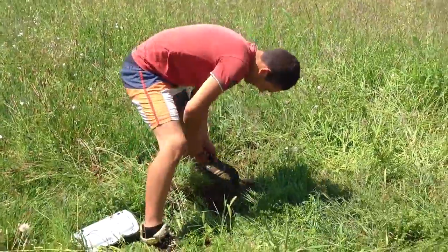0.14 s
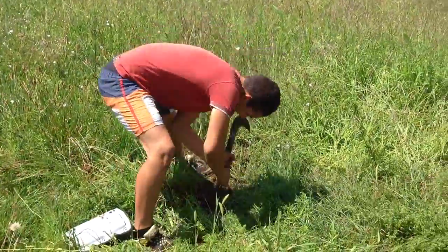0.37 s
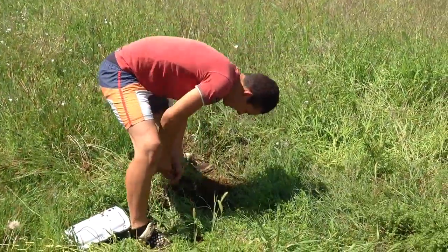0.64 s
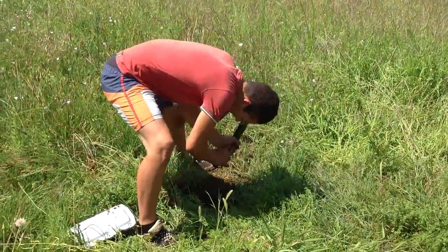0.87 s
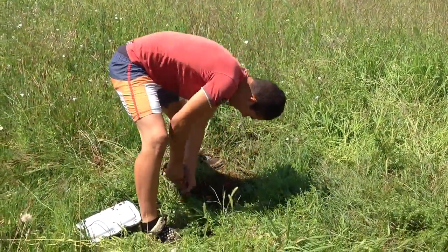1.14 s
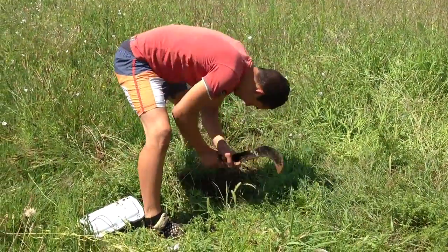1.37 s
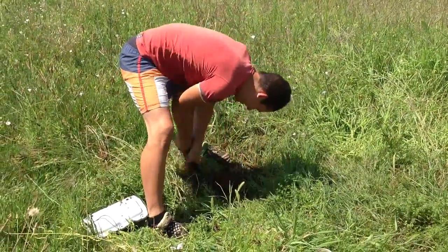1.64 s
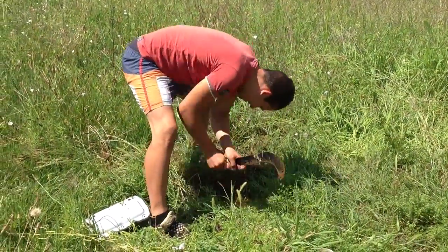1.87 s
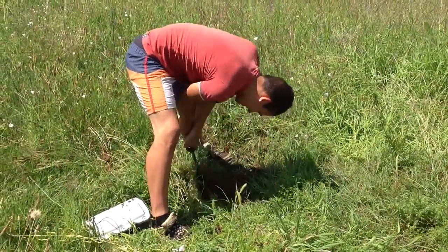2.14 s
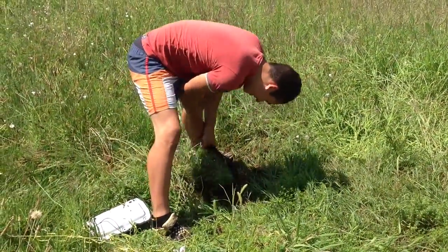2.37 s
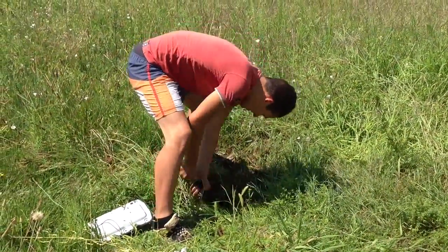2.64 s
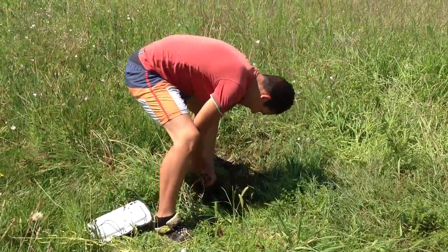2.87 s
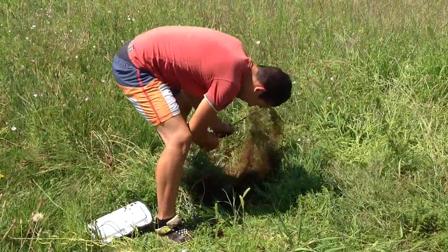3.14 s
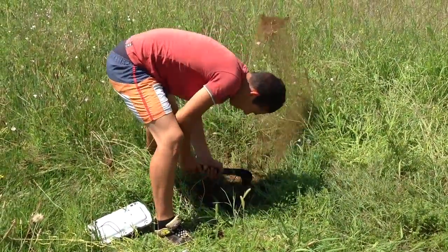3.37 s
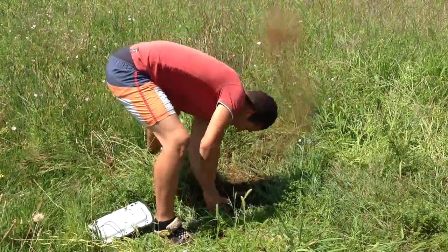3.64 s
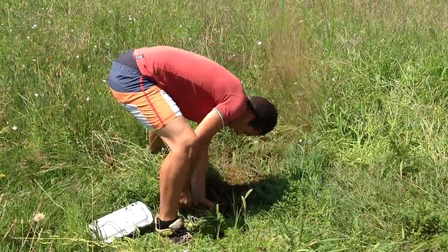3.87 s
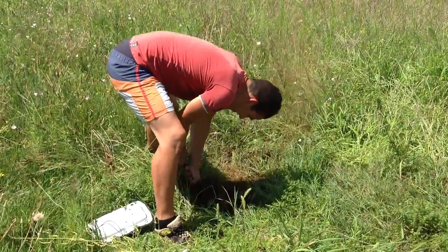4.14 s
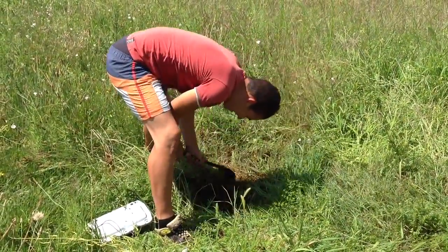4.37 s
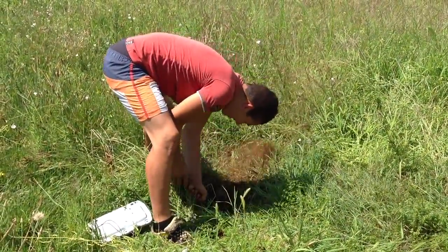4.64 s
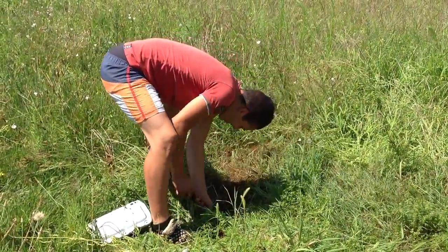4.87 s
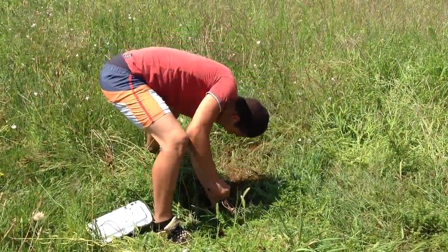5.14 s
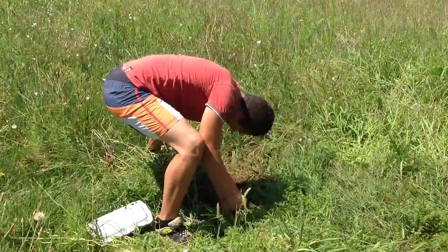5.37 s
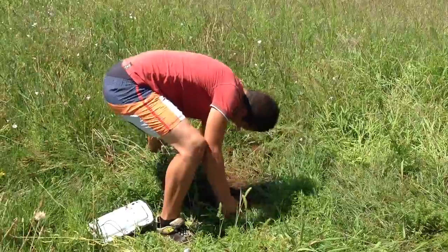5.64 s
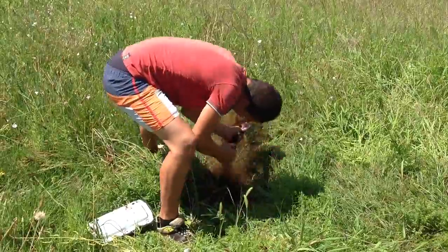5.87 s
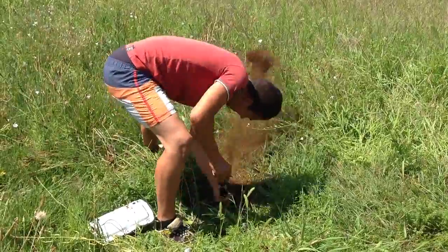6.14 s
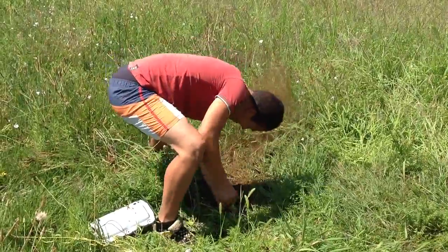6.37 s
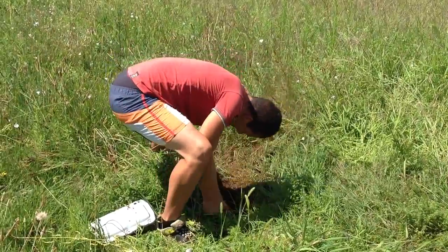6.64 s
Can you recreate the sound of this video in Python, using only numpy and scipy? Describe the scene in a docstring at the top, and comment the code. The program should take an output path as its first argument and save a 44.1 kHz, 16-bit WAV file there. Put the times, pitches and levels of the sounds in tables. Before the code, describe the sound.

An open summer field: soft broadband hush, low distant rumble and faint engine hum, with a cicada chirring near 4.5-5 kHz in quick raspy bursts, about six a second, throughout. Light ticks and grassy rustle open the scene. A hooked blade chops into turf at 0.5, 1.1, 1.6 and 2.1 s: brief grass swish, gritty crunch, short sagging thud. The first and fourth clack brightly on stone, the second knocks lower, the third is duller and earthier. Soil rustles after the last. From 2.8 to 3.1 s the blade scrapes and knocks on stones. A big handful of earth is flung at 3.2 s, hissing down in fine grains; another swell comes at 3.9 s, then scraping clinks around 4.2 s. Quieter raking and small ticks run from 4.7 to 5.6 s. More soil showers at 6.2 and 6.45 s, with soft wind buffeting. Close, dry, identical in both channels.

```python
"""A hooked hand tool chops four times into grassy soil, knocks on stones, then rakes and flings loose earth.
Soil is made of random grains, thuds are sagging tones, and knocks are gritty contacts ringing blade modes.
A cicada chirrs in short bursts of pulsed noise through body resonances.
Filtered noise gives the hush of a summer field, rumble, wind and a far engine hum; both channels are alike."""
import sys
import numpy as np
from scipy import signal
from scipy.fft import rfft, irfft
from scipy.io import wavfile
from scipy.ndimage import uniform_filter1d

SR = 44100
rng = np.random.default_rng(int(sys.argv[2]) if len(sys.argv) > 2 else 0)


def level_to_linear(level):
    """Convert decibel levels to linear amplitude factors, elementwise."""
    exponent = np.asarray(level, float) / 20
    return 10 ** exponent


def wrap_up_sound(samples):
    """Save the sound to the file named by the first command line argument, as 16-bit audio."""
    columns = np.atleast_2d(samples).T
    # keep every value between -1 and 1, then stretch to whole-number steps
    tamed = np.clip(columns, -1, 1)
    steps = np.round(tamed * 32767).astype(np.int16)
    wavfile.write(sys.argv[1], SR, steps)


N = 298116  # length in samples


def rms_one(x):
    """Scale to unit rms."""
    return x / np.sqrt(np.mean(x ** 2) + 1e-20)


def peak_one(x):
    """Scale to unit peak."""
    return x / np.abs(x).max()


def coloured(x, spectrum):
    """Give a white signal a spectrum, drawn straight over log frequency; rms 1."""
    hz, level_db = np.transpose(spectrum)
    log_hz = np.log(np.arange(1, N // 2 + 2) * SR / N)
    gain = level_to_linear(np.interp(log_hz, np.log(hz), level_db))
    return rms_one(irfft(rfft(x) * gain, N))


def drift(rate):
    """Slow random wander: normal steps of spread 1, rate per second, joined by straight lines."""
    steps = rng.standard_normal(int(rate * N / SR) + 2)
    return np.interp(np.arange(N) * rate / SR, np.arange(len(steps)), steps)


def grains(per_s, spread_db):
    """Random clicks of either sign with a long-tailed spread of sizes."""
    sizes = level_to_linear(spread_db * np.minimum(rng.exponential(1, N), 5))
    signed = sizes * rng.choice([-1, 1], N)
    return signed * (rng.random(N) < per_s / SR)


def resonance(x, hz, width_hz):
    """Two-pole band-pass with gain about 1 on top."""
    r = np.exp(-np.pi * width_hz / SR)
    feedback = [1, -2 * r * np.cos(2 * np.pi * hz / SR), r * r]
    return signal.lfilter([(1 - r * r) / 2, 0, (r * r - 1) / 2], feedback, x)


def band(x, low_hz, high_hz):
    """Butterworth band-pass."""
    return signal.sosfilt(signal.butter(2, [low_hz, high_hz], "band", fs=SR, output="sos"), x)


def add(out, s, piece):
    """Mix a short sound in at time s."""
    at = round(s * SR)
    out[at:at + len(piece)] += piece[:N - at]


# spectrum of the field's hush: hz, level_db [dB per Hz]
HUSH_SPECTRUM = [(25, -42.5), (55, -17.5), (82, -9.5), (160, -2.5), (470, -4), (930, -2), (1250, -8),
                 (3600, -13), (6100, -13), (8300, -13.5), (15500, -14)]
# swells of wind on the microphone: centre_s, level_db, half_length_s [to 1/e]
WIND_GUSTS = [(4.5, -77, .12), (6.303, -68.5, 0.19), (6.593, -65.5, 0.175)]
# partials of the engine hum: pitch_hz, width_hz, level_db
HUM_PARTIALS = [(84, 4, -7), (167, 6, 0)]
# wavering of the engine hum: time_s, level_db
HUM_LEVELS = [(0, -67), (.43, -70), (1.0, -68.5), (2.5, -75), (3.0, -68.5), (3.5, -75), (4.4, -73),
              (4.8, -73), (6.0, -69), (6.36, -73.5), (6.76, -69)]
HUSH_DB, RUMBLE_DB, BREEZE_DB = -59, -71.5, -78.5  # each wavers around its level


def field():
    """Noise bands: the hush, far traffic near 200 Hz, wind on the microphone near 100 Hz, an engine hum."""
    t = np.arange(N) / SR
    hush = level_to_linear(HUSH_DB + 0.78 * drift(6.8)) * coloured(rng.standard_normal(N), HUSH_SPECTRUM)

    rumble_level = level_to_linear(RUMBLE_DB + 1.5 * drift(9.2) + 1.86 * drift(2.539))
    rumble = rumble_level * rms_one(band(rng.standard_normal(N), 150.1, 319.5))

    gusts = level_to_linear(BREEZE_DB)
    for s, level_db, half_s in WIND_GUSTS:
        gusts = gusts + level_to_linear(level_db) * np.exp(-((t - s) / half_s) ** 2)
    wind = gusts * level_to_linear(4.04 * drift(11)) * rms_one(band(rng.standard_normal(N), 94.4, 144.8))

    hum_db = np.interp(t, *np.transpose(HUM_LEVELS))
    hum = sum(level_to_linear(level_db) * rms_one(resonance(rng.standard_normal(N), hz, width_hz))
              for hz, width_hz, level_db in HUM_PARTIALS)
    return hush + rumble + wind + level_to_linear(hum_db) * hum


# the cicada's tempo, marking every sixth burst: start_s
SIXTH_BURST_STARTS = [-.03, .937, 1.895, 2.805, 3.73, 4.665, 5.615, 6.59, 7.57]
# the cicada's drum and body: pitch_hz, width_hz [each of two resonators is 1.307 times this], level_db
CICADA_BODY = [(4497.3, 219.3, 1), (4691.6, 109.4, -1.5), (5039, 284, -3.5), (5348.5, 223, -7),
               (6000, 430, -17.5), (6670, 301, -16.5), (7400, 945, -14.5)]
PULSES_PER_S = 195  # on average; the rate wanders
BURST_S, BURST_DB, BURST_SPREAD_DB = 0.1096, -59.5, 0.86
CHORUS_DB = -6.5  # against BURST_DB


def cicada():
    """Fast uneven drum pulses mixed with rasp ring in the body, swelling in bursts that fade a little."""
    t, bursts = np.arange(N) / SR, np.zeros(N)
    marks = np.arange(len(SIXTH_BURST_STARTS))
    starts = np.interp(np.arange(0, len(marks) - 1, 1 / 6), marks, SIXTH_BURST_STARTS)
    for s, chance in zip(starts, rng.standard_normal(len(starts))):
        fading_db = -2.5 * np.clip((t - s) / BURST_S, 0, 1)
        sounding = (t > s) * (t < s + BURST_S)
        bursts += sounding * level_to_linear(BURST_DB + BURST_SPREAD_DB * chance + fading_db)
    soft_edges = uniform_filter1d(bursts, size=SR // 30)
    chorus = level_to_linear(BURST_DB + CHORUS_DB)  # others of its kind, further off

    phase = np.cumsum(PULSES_PER_S * level_to_linear(.8 * drift(60))) / SR
    drum = rng.standard_normal(N) * (1.07 + np.exp(-4.0 * (phase % 1)))
    body = np.zeros(N)
    for k, (hz, width_hz, level_db) in enumerate(CICADA_BODY):
        delayed = np.roll(drum, 9 * k)  # each part of the body answers 9 samples after the last
        once = resonance(delayed, hz, 1.307 * width_hz)
        body += level_to_linear(level_db) * resonance(once, hz, 1.307 * width_hz)
    return (soft_edges + chorus) * rms_one(body)


# handfuls of earth and grass pulled, raked or thrown:
# height_s, soil_db, clods_db, rise_s [per 10 dB of soil], fall_s [per 10 dB of soil]
EARTH_MOVES = [(.08, -61, -64, 0.31, 0.54), (.5, -59.5, -64, 0.08, 0.42), (1.29, -55.5, -65.5, 0.053, 0.05),
               (1.71, -59.5, -66, 0.146, 0.18), (2.21, -51.5, -62.5, 0.123, 0.3),
               (2.86, -62, -56.5, 0.068, .12), (3.06, -59, -60, 0.145, 0.11),
               (3.23, -46.5, -59.5, 0.113, 0.2), (3.6, -56.5, -64, 0.22, 0.17),
               (3.91, -47.5, -62.5, 0.19, 0.2382), (4.0, -63, -58, 0.066, 0.1046),
               (4.17, -54, -55.5, 0.038, 0.1028), (4.4, -60.5, -65.5, 0.24, 0.11),
               (4.7, -54, -65, 0.107, 0.1259), (4.97, -64, -65.5, 0.223, 0.01),
               (5.15, -62, -77.5, 0.091, .2), (5.31, -66, -64, .04, .06), (5.39, -59.5, -60, .07, .08),
               (5.76, -60, -66.5, 0.099, 0.17), (6.19, -51, -63, 0.137, 0.33),
               (6.45, -52.5, -66.5, 0.188, 0.1157)]
# spectrum of the fine soil: hz, level_db [dB per Hz]
SHOWER_SPECTRUM = [(1500, -28.5), (3000, -10.5), (5000, -5), (8500, -5), (13000, -0.5), (15500, -6)]
# spectrum of the clods: hz, level_db [dB per Hz]
CLOD_SPECTRUM = [(600, -21.5), (1400, -6), (2200, -0.5), (3500, -3), (6000, -2.5), (10000, -34)]
STIRRING_SOIL_DB, STIRRING_CLODS_DB = -74, -72  # the hands never rest quite
PEBBLES_PER_S, PEBBLES_DB = 60, -11  # stray ticks, level against the clods


def raking():
    """Soil rains on the grass as dense fine grains; clods scrape coarser and lower, and pebbles tick."""
    t = np.arange(N) / SR
    soil_power, clods_power = level_to_linear(2 * STIRRING_SOIL_DB), level_to_linear(2 * STIRRING_CLODS_DB)
    for s, soil_db, clods_db, rise_s, fall_s in EARTH_MOVES:
        away_db = -10 * np.where(t < s, (s - t) / rise_s, (t - s) / fall_s)
        soil_power = soil_power + level_to_linear(2 * (soil_db + away_db))
        clods_power = clods_power + level_to_linear(2 * (clods_db + 1.25 * away_db))
    shower = coloured(grains(16000 * level_to_linear(1.5 * drift(60)), spread_db=2.5), SHOWER_SPECTRUM)
    clods = coloured(grains(2500 * level_to_linear(2.5 * drift(50)), spread_db=3.5), CLOD_SPECTRUM)
    pebbles = rms_one(resonance(grains(PEBBLES_PER_S, spread_db=4.0), 3370, 1800))
    coarse = clods + level_to_linear(PEBBLES_DB) * pebbles
    return np.sqrt(soil_power) * shower + np.sqrt(clods_power) * coarse


# blade on stone, root or clod:
# start_s, blade_peak_db, pitch_hz [where it rings most], contact_ms [decay to 1/e], dull_peak_db
BLADE_KNOCKS = [(.079, -44.5, 900, 1.08, -46), (0.0972, -44, 2500, 0.62, -48.5),
                (.1515, -53, 2600, .89, -45.5), (.3108, -42, 4700, 0.83, -51),
                (0.5223, -18, 7500, 0.99, -45.5), (.5268, -23.5, 8200, 0.65, -39.5),
                (.5363, -31.5, 11000, 1.4, -56.5), (1.054, -31.5, 3400, 0.69, -61.5),
                (1.0749, -37.5, 12600, 0.72, -36.5), (1.0767, -21, 2990, 1.56, -46.5),
                (1.568, -37.5, 900, 8.1, -40.5), (1.677, -36.5, 9800, 1.28, -46),
                (2.068, -44.5, 900, 4.8, -45.5), (2.0908, -16, 6000, 0.94, -41),
                (2.0925, -23.5, 5500, 3.1, -40), (2.1574, -32, 7400, 3.2, -59.5),
                (2.169, -34.5, 6400, 1.12, -52), (2.782, -38.5, 11000, 0.83, -57),
                (2.8457, -27.5, 3150, 2.44, -55), (2.85, -41.5, 1750, 1.74, -60),
                (2.8871, -23, 2890, .74, -32.5), (2.963, -42, 6000, 0.86, -60),
                (2.972, -38, 4900, .91, -57), (2.9743, -26, 8500, 1.7, -58), (3.0654, -36, 3300, 2.64, -52),
                (3.2743, -38, 8000, 0.59, -56), (3.6172, -34, 6400, 2.65, -58),
                (3.8235, -40, 2620, 1.08, -62), (3.84, -34.5, 9000, 0.68, -62),
                (3.891, -35, 9420, 1.15, -66), (3.983, -50.5, 1900, 1.5, -63),
                (4.007, -37.5, 2232, 5.1, -56.5), (4.1396, -31.5, 3300, 1.7, -66.5),
                (4.146, -33.5, 3300, .89, -54.5), (4.174, -48, 2200, 1.43, -51.5),
                (4.183, -35.5, 2236, 3.4, -46.5), (4.328, -41, 7500, 1.13, -66),
                (4.3414, -35.5, 3620, 0.88, -47.5), (4.3883, -47, 1750, 2.1, -54),
                (4.6985, -43, 3400, 3.2, -55.5), (5.3038, -44.5, 3600, 1.07, -51.5),
                (5.3339, -39, 3600, 1.7, -53), (5.37, -43.5, 3740, 4.2, -57.5),
                (5.399, -41.5, 3900, 2.8, -54), (5.418, -42.5, 3800, 2.5, -52.5),
                (5.44, -53, 1650, 3.8, -60), (5.4612, -43.5, 3300, 1.05, -56.5),
                (5.58, -40.5, 3600, 2.7, -47.5), (5.9988, -44, 11000, .6, -59.5),
                (6.203, -37.5, 9000, 0.95, -56), (6.5285, -37, 3760, 1.8, -52)]
# ringing modes of the blade: pitch_hz, level_db, t60_s [approximate]
BLADE_MODES = [(900, 1, 0.025), (1750, 6, 0.0347), (2671, 1, 0.0186), (3300, -4, 0.0086), (4202, 1, 0.0028),
               (5320, 0.5, 0.0044), (5290, 5.5, 0.0205), (6010, 0.5, 0.013), (6400, 3, 0.0088),
               (7500, 0, 0.0082), (8500, 0, 0.0081), (9800, 4.5, 0.0093), (11390, 1, 0.0076),
               (12600, 0.5, 0.0098)]
GRIT_DB = -5.5  # peak of the bright spit against the blade's peak


def knocks():
    """A short gritty contact drives the blade modes nearest its pitch, a bright spit and a dull knock."""
    out, t = np.zeros(N), np.arange(SR // 16) / SR
    noises = rng.standard_normal((len(BLADE_KNOCKS), 3, len(t)))
    for (s, peak_db, hz, contact_ms, dull_db), noise in zip(BLADE_KNOCKS, noises):
        contact = (1 - np.exp(-t / .0003)) * np.exp(-1000 * t / contact_ms)
        clean_tap = np.sqrt(contact @ contact) * (t == t[8])
        blow = contact * noise[0] + clean_tap  # one clean tap amid the chatter
        rings = np.zeros(len(t))
        for mode_hz, level_db, t60_s in BLADE_MODES:
            mode_db = level_db - 24.14 * np.abs(np.log2(mode_hz / hz))  # weaker by 24.14 dB an octave away
            rings += level_to_linear(mode_db) * resonance(blow, mode_hz, 2.34 / t60_s)
        grit = contact * band(noise[1], 3500, 16000)
        dull = band(noise[2] * np.sqrt(contact), 276, 1160)
        bright = level_to_linear(peak_db) * peak_one(rings) + level_to_linear(peak_db + GRIT_DB) * peak_one(grit)
        add(out, s, bright + level_to_linear(dull_db) * peak_one(dull))
    return out


# bites of the edge into the ground:
# deepest_s, crunch_db, bite_ms [decay to 1/e], lead_in_ms [scale of the swell through grass], lead_in_db
CHOP_BITES = [(0.523, -28.5, 2.08, 12.7, -41), (1.0752, -25, 4.2, 16.9, -38.5),
              (1.571, -32, 11.75, 11.2, -39.5), (2.073, -33.5, 6, 18.75, -36.5)]
# spectrum of the crunch: hz, level_db [dB per Hz]
CRUNCH_SPECTRUM = [(240, -27.5), (400, -18), (1220, -11.5), (2630, -6.5), (4770, -5), (5230, -4),
                   (9650, -4.5), (14400, -1), (15500, -8)]
CRUMBS_DB, CRUMBS_MS = -39.5, 33.6  # what settles after every chop, decay to 1/e


def chops():
    """The edge hisses through grass, crunches into soil, and crumbs settle: one grain texture, shaped."""
    t, envelope = np.arange(N) / SR, np.zeros(N)
    for s, crunch_db, bite_ms, lead_ms, lead_db in CHOP_BITES:
        ms = 1000 * (t - s)
        bite = np.exp(np.where(ms < 0, -(ms / (0.382 * bite_ms)) ** 2, -ms / bite_ms))
        lead = (ms < 0) * np.clip(1.15 + ms / lead_ms, 0, 1) ** .6
        crumbs = (ms >= 0) * np.exp(-np.abs(ms) / CRUMBS_MS)
        envelope += level_to_linear(crunch_db) * bite + level_to_linear(lead_db) * lead + level_to_linear(CRUMBS_DB) * crumbs
    crunch = coloured(grains(20000, spread_db=2.0), CRUNCH_SPECTRUM)
    return envelope * crunch * level_to_linear(1.5 * drift(600))


# the ground thuds under a blow: start_s, level_db [tone before swell and filter], start_hz, t60_s
GROUND_THUDS = [(.526, -38, 256, 0.041), (1.075, -34.5, 296.5, 0.0537), (1.566, -37, 342, 0.073),
                (1.577, -33.5, 253, 0.1243), (2.067, -42, 333.5, 0.205), (2.092, -35.5, 225, 0.044),
                (2.135, -48.5, 302.4, 0.058), (2.64, -49, 210.7, 0.068), (2.885, -39.5, 314, 0.017),
                (4.182, -45.5, 350, 0.0313), (6.199, -48.5, 251.7, 0.066)]
THUD_SAG = 0.6426  # end pitch over start pitch


def thuds():
    """A damped low ring of turf sags in pitch as the soil loosens, roughened by the soil giving way."""
    out, t = np.zeros(N), np.arange(SR // 4) / SR
    noises = rng.standard_normal((len(GROUND_THUDS), len(t)))
    for (s, level_db, start_hz, t60_s), noise in zip(GROUND_THUDS, noises):
        end_hz = THUD_SAG * start_hz
        swell = (1 - np.exp(-t / 0.00229)) * level_to_linear(-60 * t / t60_s)
        pitch_hz = end_hz + (start_hz - end_hz) * np.exp(-8.0 * t / t60_s)
        tone = np.sin(2 * np.pi * np.cumsum(pitch_hz) / SR)
        rough = rms_one(band(noise, 0.408 * end_hz, 1.485 * start_hz))
        add(out, s, level_to_linear(level_db) * band(swell * (tone + 0.545 * rough), 100, 2800))
    return out


def scene():
    """All sources reach one microphone, which feeds both channels."""
    mono = field() + cicada() + raking() + knocks() + chops() + thuds()
    return np.tile(mono, (2, 1))


def band_limit(x):
    """A steep low-pass at the top of the band."""
    return signal.sosfilt(signal.butter(12, 16290, fs=SR, output="sos"), x)


def record(dry):
    """The bass is rolled off below 70 Hz and the top is cut steeply, 50 dB down from 15450 Hz."""
    low_cut = signal.butter(2, 70, "high", fs=SR, output="sos")
    top_cut = signal.cheby2(24, 50, 15450, fs=SR, output="sos")
    mix = signal.sosfilt(top_cut, signal.sosfilt(low_cut, dry))
    return band_limit(mix)


dry = scene()
out = record(dry)
wrap_up_sound(out)
```